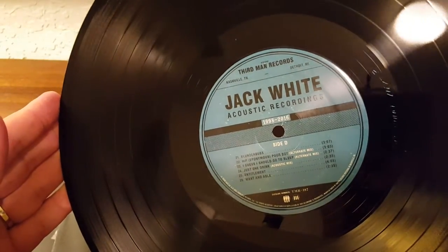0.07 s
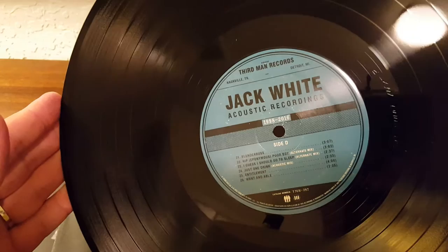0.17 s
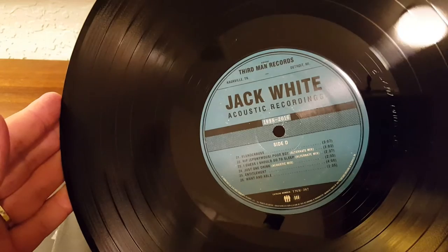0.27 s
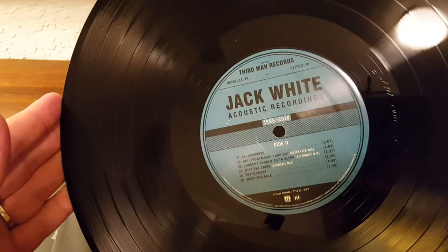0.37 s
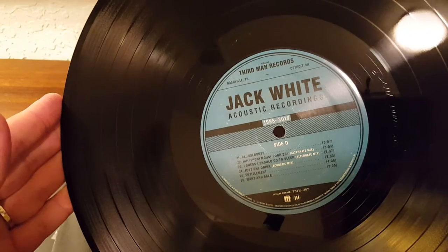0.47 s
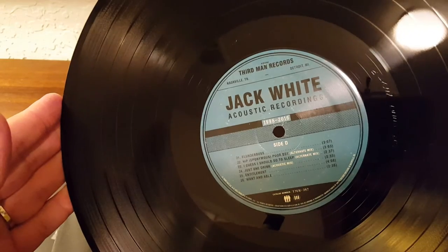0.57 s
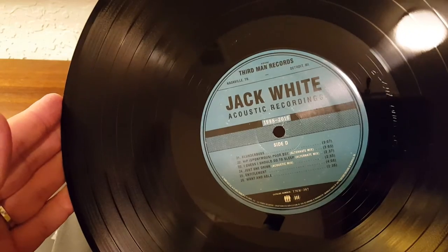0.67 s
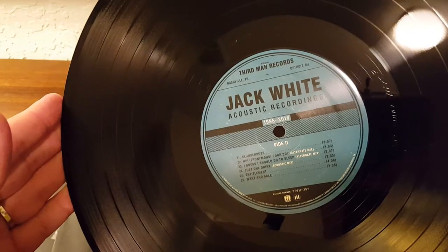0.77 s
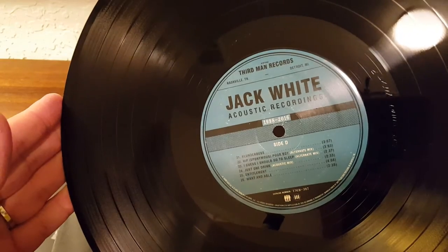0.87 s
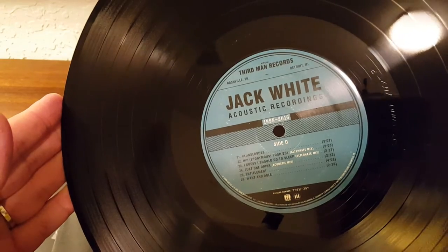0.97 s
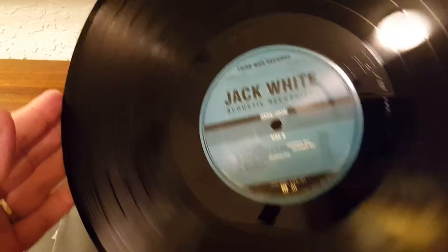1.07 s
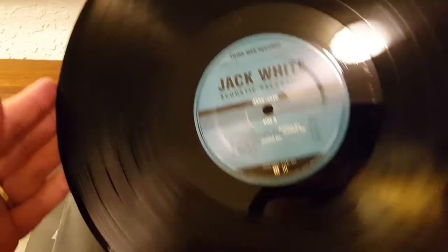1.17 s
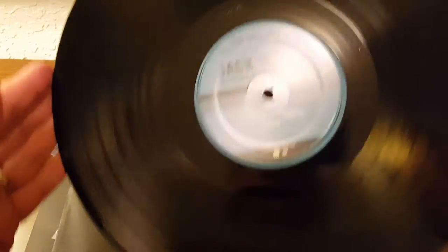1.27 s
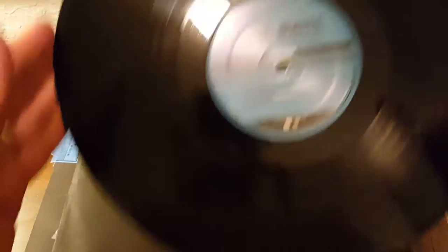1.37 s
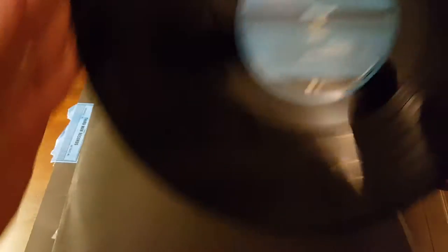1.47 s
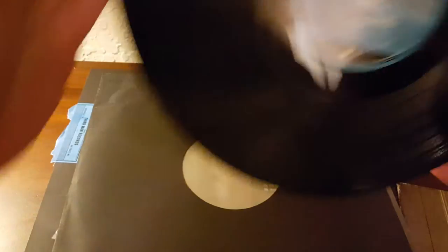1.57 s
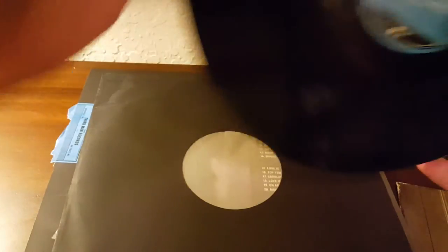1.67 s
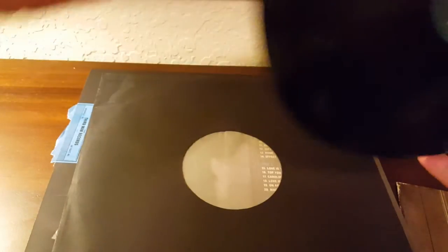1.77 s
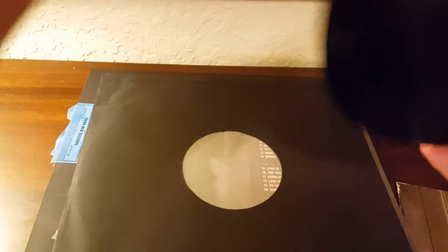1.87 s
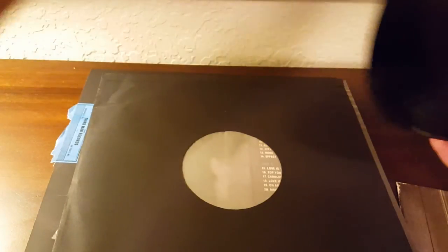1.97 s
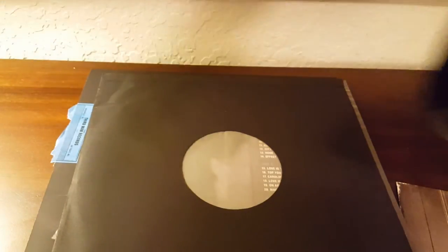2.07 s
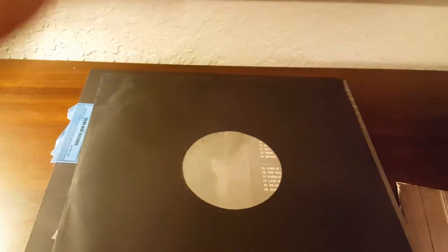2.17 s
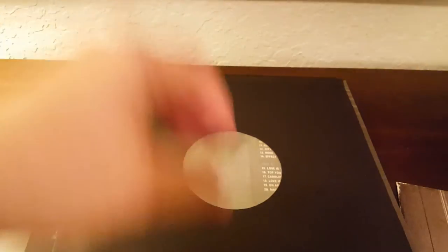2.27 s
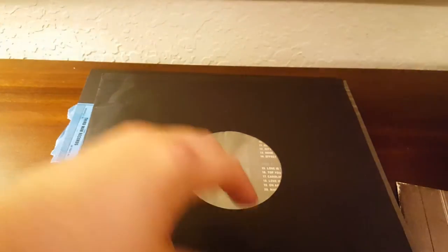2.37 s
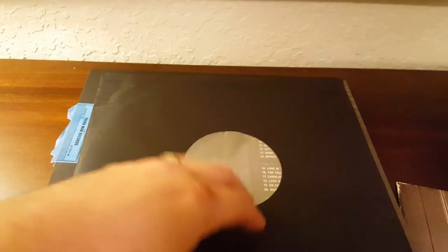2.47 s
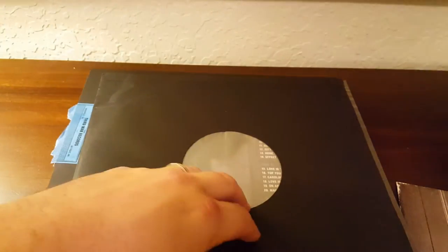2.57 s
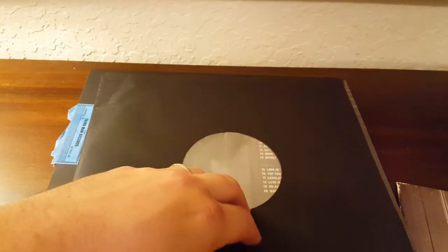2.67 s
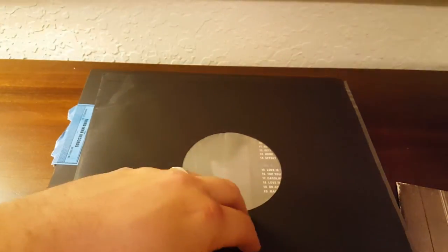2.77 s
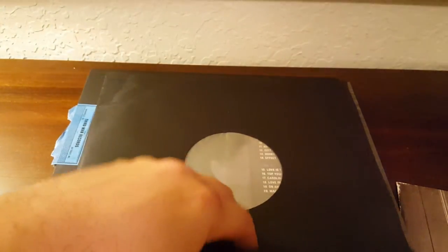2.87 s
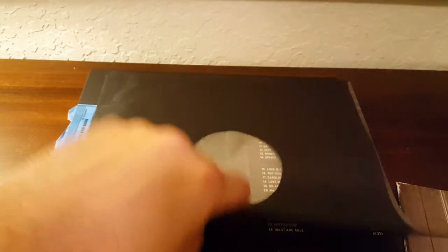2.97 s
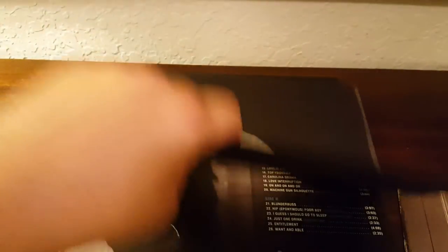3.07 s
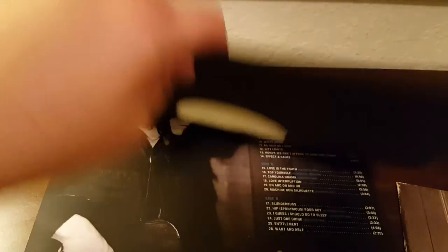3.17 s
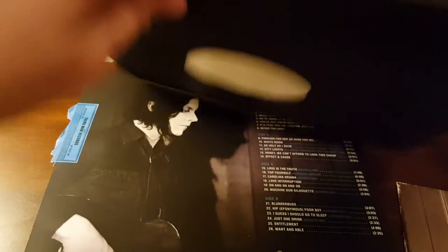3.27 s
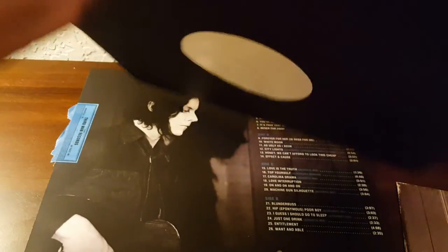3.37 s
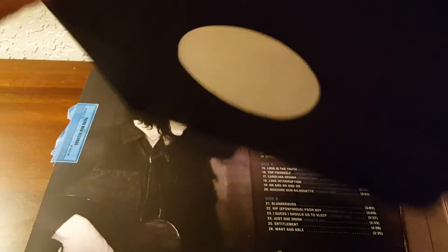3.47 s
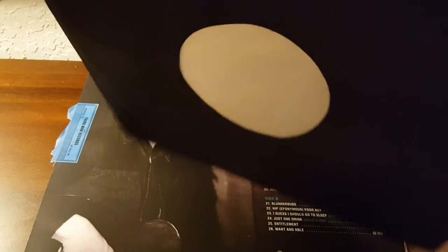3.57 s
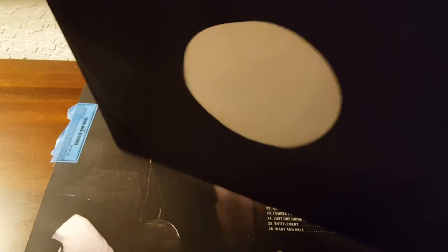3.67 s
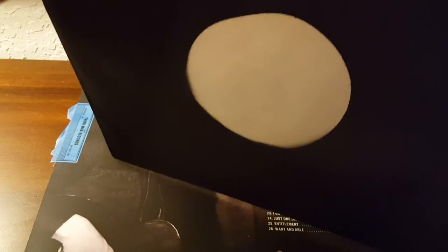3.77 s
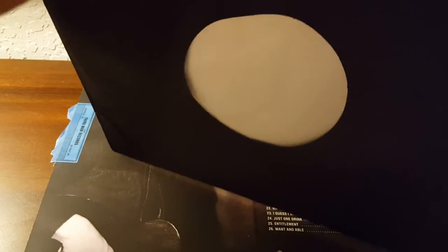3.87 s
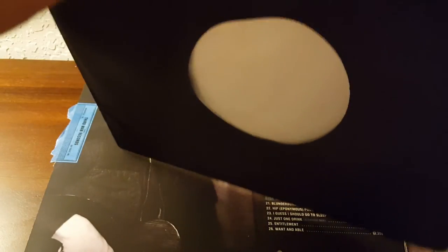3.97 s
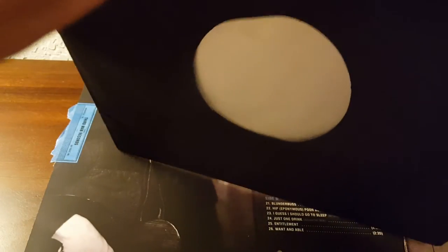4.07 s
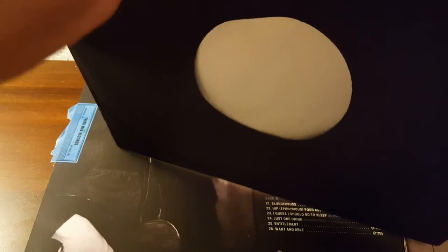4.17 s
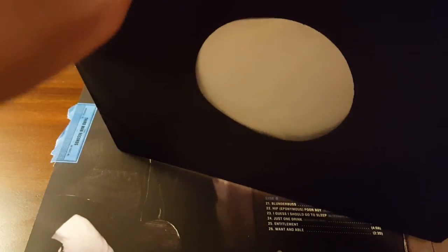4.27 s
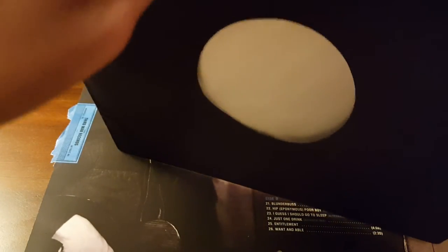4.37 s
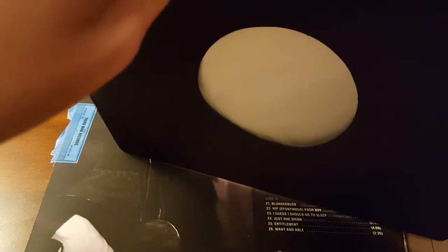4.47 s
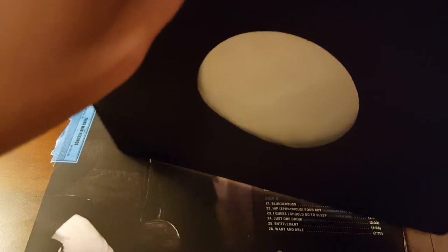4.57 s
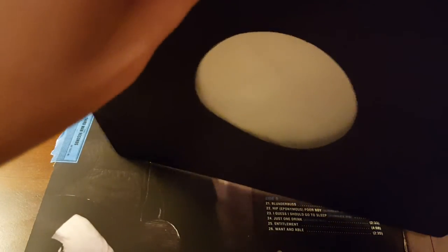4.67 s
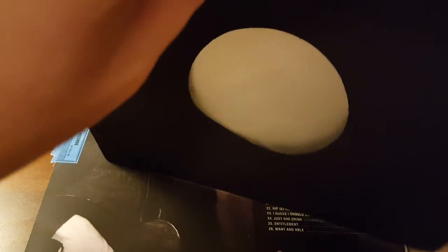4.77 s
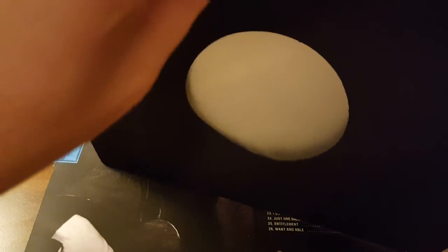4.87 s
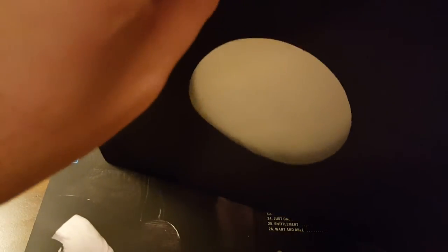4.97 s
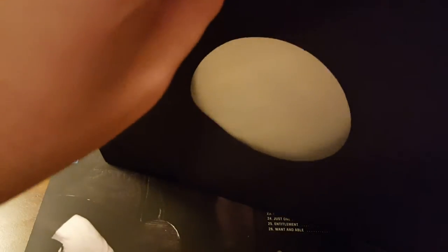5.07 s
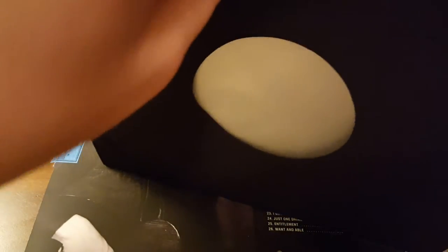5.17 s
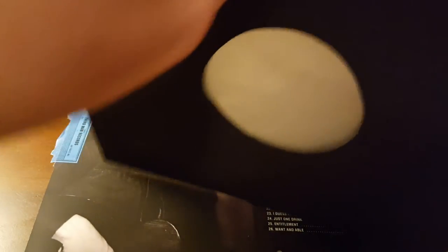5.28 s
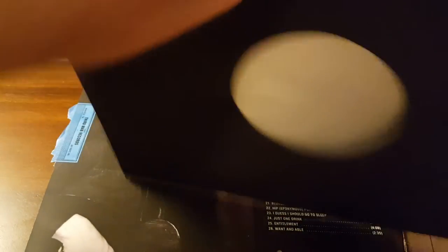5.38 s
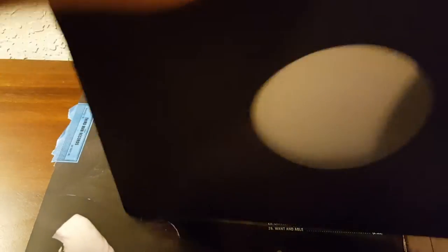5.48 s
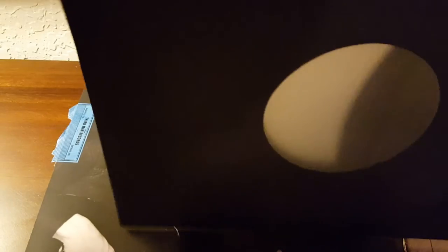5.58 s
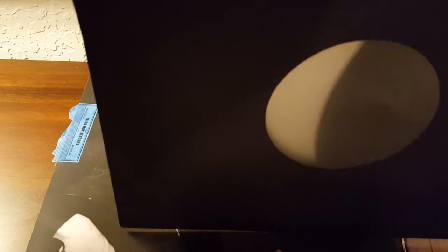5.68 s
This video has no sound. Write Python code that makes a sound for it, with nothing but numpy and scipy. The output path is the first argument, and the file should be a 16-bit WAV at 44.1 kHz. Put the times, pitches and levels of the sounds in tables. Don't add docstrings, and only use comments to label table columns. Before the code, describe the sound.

Close stereo recording in a small quiet room with faint hum and hiss. A held vinyl disc creaks under soft palm scuffs, then knocks dully on a wooden table. After a near-silent pause, a paper sleeve drags off a cardboard cover in dry scratchy bursts, then is worked open with sparse crackles, hollow pops and a loud final flurry.

```python
import sys
import numpy as np
from scipy import signal
from scipy.fft import rfft, irfft, next_fast_len
from scipy.io import wavfile
from scipy.ndimage import map_coordinates

SR = 44100
rng = np.random.default_rng(int(sys.argv[2]) if len(sys.argv) > 2 else 0)


def materialize(psi):
    bounded = np.clip(np.atleast_2d(psi).T, -1, 1)
    quanta = np.round(bounded * 32767).astype(np.int16)
    wavfile.write(sys.argv[1], SR, quanta)


def elevation(decibels):
    levels = np.asarray(decibels, float)
    return 10 ** (levels / 20)


N = 251811
T = np.arange(N) / SR

# (frequency [Hz], density [dB per Hz])
ROOM_TONE = [(20, -18), (60, -3), (100, 0), (160, -2), (250, -5), (500, -8), (800, -8), (1300, -12),
             (2000, -16), (3000, -20), (5000, -27), (8000, -45)]
# (frequency [Hz], correlation [1])
TONE_LIKENESS = [(60, 0.6), (240, 0.4), (950, 0.5), (3770, -0.7), (15000, -0.7)]
# (frequency [Hz], width [Hz], level [dB])
HUM_BAND = (119, 11, -74.5)
# (frequency [Hz], level [dB])
WHINE_TONE = (8624, -94)
# (frequency [Hz], density [dB per Hz])
MIC_HISS = [(2000, -8.5), (5000, -6), (10000, -9), (13000, -5.5), (15800, -4.5)]
ROOM_TONE_DB, MIC_HISS_DB = -69.5, -83.5

# (time [s], peak [dB], pitch [Hz])
DISC_CREAKS = [
    (1.283, -58.5, 295),
    (1.381, -55, 93),
    (1.487, -52.5, 210),
    (1.599, -54.5, 280),
    (1.779, -58.5, 653),
    (1.895, -46.5, 96),
    (1.919, -48.5, 93.2),
    (2.571, -46, 107),
    (2.708, -60.5, 197),
]
CREAK_T60, SING_T60, POP_T60, DRUM_T60 = 0.087, 0.02, 0.017, 0.044

# (start [s], length [s], rub level [dB], sag over the hold [dB], fizz over rub [dB])
HELD_DRAGS = [(1.497, 0.82, -74.5, 0, -7), (2.8596, 0.056, -55, -4, -2), (2.919, 0.078, -58.5, 4, 6.5),
              (2.991, 0.078, -52.5, -2, 0.5), (3.077, 0.048, -52, -0.5, -6), (3.13, 0.024, -45, 2.5, -3),
              (3.148, 0.079, -50, -3, 1), (3.229, 0.067, -48.5, 2.5, -4), (3.302, 0.043, -61.5, -3, -11),
              (3.416, 0.042, -62.5, 13, -4), (3.444, 0.13, -70.5, 3, -9), (3.7326, 0.038, -49.5, 0, -16),
              (3.859, 0.093, -54.5, 11.5, -10), (4.12, 0.052, -56.5, 10, -4), (4.38, 0.02, -55.5, 0, -3),
              (4.706, 0.03, -58, 8, 0.5), (5.06, 0.065, -56, -1, -8), (4.203, 0.049, -64, -1, -2),
              (4.247, 0.16, -67, -3.5, -15), (4.619, 0.093, -62, 2, -7.5), (4.771, 0.047, -52.5, 3, -18),
              (4.835, 0.039, -62, 1, -12), (4.904, 0.03, -48, -10.5, -22), (5.132, 0.017, -56.5, 1, -13),
              (5.28, .06, -60, -1, 7), (5.395, 0.038, -37.5, 20, -4.5), (5.424, 0.17, -47.5, 10.5, -1),
              (5.587, 0.22, -60.5, 5.5, 9.5)]
# (top [s], rub level [dB], rise [s], fall [s], fizz over rub [dB])
HAND_SWEEPS = [(1.35, -73, 0.021, 0.034, -1), (1.384, -71, 0.016, 0.097, -5.5),
               (1.7, -64, 0.031, 0.0067, -25), (2.106, -72, 0.024, 0.17, -4.5),
               (2.572, -60.5, 0.002, 0.022, -2.5), (2.662, -69.5, 0.0058, 0.014, 1.5),
               (2.722, -79.5, 0.02, 0.07, 11), (2.78, -67.5, 0.061, 0.23, -1.5),
               (3.39, -67, 0.043, 0.026, 4.5), (3.578, -62.5, 0.038, 0.014, -2.5),
               (4.182, -50.5, 0.02, 0.021, -13), (3.744, -43, 0.004, 0.016, -12),
               (4.035, -56, .06, 0.079, -11.5), (4.419, -46, 0.019, 0.037, -10),
               (4.569, -55, 0.016, 0.019, -13), (4.53, -59, 0.085, 0.039, -16),
               (4.745, -50.5, 0.04, 0.021, -21), (4.938, -37.5, 0.019, 0.019, -9),
               (5.0, -62, .04, 0.047, -9), (5.087, -51.5, 0.015, 0.02, -8),
               (5.185, -53, 0.037, 0.06, -13.5), (5.325, -57.5, 0.043, 0.03, 4.5),
               (5.362, -40.5, 0.019, 0.029, -10.5)]
GRIP_S, LET_GO_S = 0.001, 0.0086
FIZZ_LINGERS = 1.37
FIZZ_LAG_DB, FIZZ_LAG_S = 9, 0.011
# (time [s], flex over rub [dB])
SLACK = [(1.3, 3), (1.9, 0.5), (2.1, -3), (2.55, -14.5), (2.8, -6.5), (3.0, 0.5), (3.25, -5.5), (3.4, 3),
         (3.7, 1), (3.9, 1), (4.15, 1), (4.4, 0), (4.6, 1), (4.8, 7), (4.95, -2.5), (5.2, -5.5),
         (5.36, 8.5), (5.5, 6.5)]
STIFFEN, FIRM_DB = 0.33, -54.5
# (time [s], frequency [Hz])
SHEET_RING = [(1.3, 1580), (2.65, 1560), (2.9, 3180), (2.98, 2240), (3.1, 2460), (3.2, 2960), (3.29, 2500),
              (3.7, 1670), (3.76, 1470), (3.88, 2130), (4.35, 1640), (4.57, 2000), (4.88, 1570),
              (4.97, 2500), (5.1, 2130), (5.18, 1610), (5.31, 2430), (5.37, 1610), (5.6, 1920)]
# (time [s], frequency [Hz])
EDGE_RING = [(2.5, 5840), (2.55, 4600), (2.7, 5600), (2.73, 4500), (3.06, 5400), (3.18, 4120), (3.4, 5660),
             (3.5, 4620), (3.58, 6400), (3.75, 4730), (5.24, 4190), (5.41, 4550), (5.46, 6850), (5.7, 6690)]
# (frequency [Hz], density [dB per Hz])
RUB_SPECTRUM = [(290, -64), (500, -10.5), (669, -5.5), (1090, -6), (1260, -4.5), (2000, -8.5), (2100, -6),
                (3170, -10), (3430, -10), (3680, -12), (5500, -18), (7150, -27.5), (12100, -120)]
FIZZ_SPECTRUM = [(2060, -14), (3500, -3.5), (5160, -5.5), (6650, -2.5), (11500, -5), (12800, -6.5),
                 (15200, -7), (16000, -41.5)]
FLEX_SPECTRUM = [(18, -53), (30, 5.5), (85, -4.5), (274, -1.5), (341, -9), (468, -2.5), (560, -13.5),
                 (678, -5), (800, -10.5), (1040, -12), (1760, -120)]
# (frequency [Hz], width [Hz], level [dB])
AIR_POCKET = [(720, 56, -1), (1533, 88, 1), (2500, 260, -6)]
POCKET_OPENS_S, POCKET_DB = 3.6, -4.5

# (time [s], peak [dB], pitch [Hz])
PATCH_SINGS = [(1.378, -54.5, 800), (1.693, -53, 1560), (2.556, -56, 915), (2.569, -53, 1630),
               (2.57, -59, 4230), (2.581, -53, 1610), (2.737, -62, 4020), (2.752, -59, 3800),
               (3.021, -48, 2350), (4.835, -48, 3300), (4.89, -44, 640), (4.9, -42, 704),
               (3.146, -38, 2250), (3.186, -36, 3580), (3.202, -38, 2800), (3.741, -36.5, 1430),
               (3.752, -38, 1305), (3.762, -49, 1240), (4.172, -47, 1530), (4.175, -46.5, 3150),
               (4.18, -38, 1555), (4.186, -38, 1640), (4.39, -42, 1470), (4.417, -37, 780),
               (4.419, -35, 2620), (4.437, -33.5, 1590), (4.449, -45, 1660), (4.563, -38, 2270),
               (4.567, -50, 736), (4.718, -50, 4500), (4.928, -32.5, 3380), (4.947, -35.5, 3540),
               (5.072, -50, 685), (5.085, -50, 2100), (5.166, -57, 1310), (5.185, -49, 1550),
               (5.284, -50, 3820), (5.312, -40.5, 3780), (5.332, -35, 3420), (5.7, -44.5, 1420)]
# (time [s], level [dB])
PALM_PRESSURE = [
    (1.484, -90),
    (1.49, -64),
    (1.7, -65.5),
    (1.74, -71),
    (1.83, -65),
    (1.96, -64),
    (2.02, -78),
    (2.09, -66),
    (2.14, -60),
]
# (frequency [Hz], density [dB per Hz])
PALM_SPECTRUM = [(90, -26.5), (160, -4.5), (280, 0), (450, -5), (700, -28.5), (1200, -38.5)]

# (time [s], peak [dB], centre [Hz])
CREASE_SNAPS = [(1.6946, -43, 840), (2.57, -45.5, 1610), (2.7833, -38.5, 990), (2.8603, -38, 2150),
                (2.9916, -38, 2000), (3.1273, -29.5, 1200), (3.175, -23.5, 3980), (3.227, -38, 4500),
                (3.4515, -38.5, 900), (3.7345, -41, 895), (3.868, -48, 1790), (4.387, -33, 1000),
                (4.4065, -29.5, 5600), (4.414, -29.5, 2970), (4.6667, -36.5, 2350), (4.905, -41, 1420),
                (4.9346, -35, 1260), (4.9448, -19, 4170), (5.06, -51.5, 1500), (5.362, -18.5, 1500),
                (5.409, -26, 2610), (5.457, -23, 1700), (5.501, -35, 1800)]
# (time [s], peak [dB], centre [Hz])
EDGE_FLICKS = [(2.5422, -52, 1050), (2.5965, -52, 6000), (2.659, -55, 991), (2.7112, -62, 977),
               (3.5037, -53, 1510), (3.8145, -46.5, 3500), (4.1042, -40, 1510), (4.1185, -43, 2200),
               (4.138, -56, 3000), (4.79, -48, 3400), (5.3928, -28, 2000), (4.642, -43.5, 4200),
               (4.773, -42, 1020), (4.3277, -49.5, 1130), (4.364, -40.5, 6300), (4.4804, -42.5, 4200),
               (4.836, -39, 3280), (5.5663, -30, 3420)]
SNAP_TICK_DB, FLICK_TICK_DB = -32, -5.5

# (time [s], level [dB])
TABLE_KNOCKS = [
    (2.1448, -22.5),
    (2.1489, -13),
    (2.165, -29),
]
# (frequency [Hz], level [dB], t60 [s])
TABLE_MODES = [(95.8, -12.5, 0.31), (158.4, -9.5, 0.18), (217.6, -11.5, 0.18), (260, -6, 0.11),
               (292, -9, 0.15), (437, -1, 0.085), (457, -11, 0.24), (510, -17.5, 0.18), (540, 8, 0.034),
               (546, -6.5, 0.13), (606, -12, 0.22), (768, -11.5, 0.13), (940, -22, 0.12), (1154, -24, 0.1)]
# (frequency [Hz], density [dB per Hz])
SHIVER_SPECTRUM = [(530, -37), (900, -8.5), (1120, -4.5), (1410, -23), (1610, -17), (2480, -23),
                   (2970, -25), (7000, -47), (9100, -79), (15400, -120)]

# (time [s], peak [dB], pitch [Hz])
SHEET_POPS = [(2.862, -41.5, 620), (3.331, -47.5, 327), (3.417, -45.5, 269), (3.449, -47, 199),
              (3.734, -45, 506), (2.873, -49, 710), (3.226, -43.5, 326), (3.317, -53, 403),
              (4.127, -44.5, 356), (4.136, -47, 199), (4.02, -49, 295), (4.038, -57, 344),
              (5.157, -49, 244), (5.364, -26, 248), (5.532, -37, 260), (4.069, -39.5, 213),
              (4.385, -38, 158), (4.529, -42, 297), (4.688, -40.5, 197), (4.795, -32, 240),
              (4.806, -42, 300), (4.82, -43, 340), (5.12, -50, 520), (5.31, -54, 544), (5.334, -38.5, 540),
              (5.344, -38, 506), (4.912, -32, 720), (5.353, -26, 258), (5.361, -26, 265),
              (5.392, -21.5, 222), (5.407, -31.5, 179), (5.398, -29, 500), (5.435, -39, 497),
              (5.429, -51, 280), (5.469, -33, 91.5), (5.529, -28.5, 238), (5.579, -32, 150),
              (5.638, -51, 152)]
# (time [s], peak [dB], pitch [Hz])
COVER_DRUMS = [
    (2.912, -47.5, 538),
    (2.992, -41.5, 497),
    (3.033, -43, 550),
    (3.061, -38, 530),
    (3.1, -42, 536),
    (3.127, -38.5, 572),
    (3.155, -38.5, 502),
    (3.177, -45, 504),
    (3.225, -47, 512),
]
# (time [s], frequency [Hz], level [dB])
FINGER_SQUEAK = [
    (5.275, 1657, -75),
    (5.29, 1895, -51),
    (5.305, 2260, -38),
    (5.32, 2720, -47),
    (5.335, 3370, -49),
    (5.345, 3730, -67),
]

# (time [s], left lag [samples], left over right [dB])
SOURCE_PLACE = [(1, -6, -0.5), (2.3, -3.5, -2), (3, 1, -0.5), (3.9, 7.5, -1), (4.3, 11, -2), (5.7, 9, -3.5)]
# (frequency [Hz], t60 [s])
ROOM_T60 = [(150, 0.39), (1000, 0.27), (5000, 0.22), (14000, 0.061)]


def unit(x):
    return x / np.sqrt(np.mean(x ** 2) + 1e-20)


def along(points, hz):
    f, v = np.transpose(points)
    return np.interp(np.log(hz + 1), np.log(f + 1), v)


def curves(rows):
    s, *columns = np.transpose(rows)
    return [np.interp(T, np.maximum.accumulate(s), column) for column in columns]


def wobble(rate):
    knots = rng.standard_normal(int(N * rate / SR) + 4)
    return np.interp(T * rate, np.arange(len(knots)), knots)


def filtered(x, response):
    m = next_fast_len(N + 8192)
    return irfft(rfft(x, m) * response(np.fft.rfftfreq(m, 1 / SR)), m)[..., :N]


def coloured(x, spectrum):
    return unit(filtered(x, lambda hz: elevation(along(spectrum, hz))))


def add(x, s, piece):
    x[round(s * SR):][:len(piece)] += piece[:N - round(s * SR)]


def damped_rings(rows, t60, overtone):
    x, t = np.zeros(N), np.arange(SR // 5) / SR
    shape = elevation(-60 * t / t60) * (1 - np.exp(-t / 0.0038))
    for s, db, hz in rows:
        ring = np.sin(2 * np.pi * hz * t) + overtone * np.sin(2 * np.pi * 2.3 * hz * t)
        add(x, s, elevation(db - 4.0) * ring * shape / shape.max())
    return x


def fibres(spread_db, clump_db, own, crackle_db, ring_hz=None, ring_db=0):
    shared, left, right = rng.standard_normal((3, N))
    size = elevation(spread_db * rng.standard_normal(N) + clump_db * (wobble(40) + wobble(160)))
    stiff = rng.random(N) < 150 / SR
    crackle = elevation(crackle_db + 3.7 * rng.standard_normal(N)) * stiff
    slips = size * (shared + own * np.array([left, right])) + crackle
    if ring_hz is None:
        return slips
    hz, t, z = signal.stft(slips, SR, nperseg=256)
    centre = np.interp(t, T, ring_hz)
    detuning = np.log(hz[:, None] / centre + 1e-3)
    ring = elevation(ring_db / (1 + (detuning / 0.22) ** 2))
    return signal.istft(z * ring, SR, nperseg=256)[1][:, :N]


def air():
    def mid_and_side(hz):
        angle = np.arccos(np.clip(along(TONE_LIKENESS, hz), 0, 1)) / 2
        return elevation(along(ROOM_TONE, hz)) * [hz ** 0, np.tan(angle)]

    mid, side = filtered(rng.standard_normal((2, N)), mid_and_side)
    tone = elevation(ROOM_TONE_DB) * np.array([mid + side, mid - side]) / np.std(mid)
    hiss = elevation(MIC_HISS_DB + 7.5) * coloured(rng.standard_normal((2, N)), MIC_HISS)
    hum_hz, hum_width, hum_db = HUM_BAND
    hum = unit(filtered(rng.standard_normal(N), lambda hz: 1 / (1 + ((hz - hum_hz) / hum_width) ** 2)))
    whine_hz, whine_db = WHINE_TONE
    whine = elevation(whine_db + 5.0 + 0.8 * wobble(4.5)) * np.sin(2 * np.pi * whine_hz * T)
    return tone + hiss + elevation(hum_db) * hum + whine


def creaks():
    return damped_rings(DISC_CREAKS, CREAK_T60, 0.16)


def strokes():
    rows = [(s, GRIP_S, hold, LET_GO_S, db, sag, fizz) for s, hold, db, sag, fizz in HELD_DRAGS]
    rows += [(s, rise, 1e-3, fall, db, 0, fizz) for s, db, rise, fall, fizz in HAND_SWEEPS]
    rub_power, fizz_power = np.full((2, N), 1e-14)
    for s, rise, hold, fall, db, sag, fizz in rows:
        at = slice(round((s - 0.5) * SR), round((s + hold + 0.5) * SR))
        u = T[at] - s
        held = db - sag * np.clip(u / hold, 0, 1) - 10 * np.maximum(-u, 0) / abs(rise)
        release = 10 * np.maximum(u - hold, 0) / abs(fall)
        lag = FIZZ_LAG_DB * (rise == GRIP_S) * np.exp(-np.abs(u) / FIZZ_LAG_S)
        rub_power[at] += elevation(2 * (held - release))
        fizz_power[at] += elevation(2 * (held + fizz - lag - release / FIZZ_LINGERS))
    return 10 * np.log10(rub_power), 10 * np.log10(fizz_power)


def pocket_response(hz):
    return sum(elevation(db) * 1j * hz * width / (centre ** 2 - hz ** 2 + 1j * hz * width)
               for centre, width, db in AIR_POCKET)


def rubbing():
    rub_db, fizz_db = strokes()
    (slack_db,), (sheet_hz,), (edge_hz,) = curves(SLACK), curves(SHEET_RING), curves(EDGE_RING)
    flex_db = rub_db + slack_db - STIFFEN * (np.maximum(rub_db, -75) - FIRM_DB)
    sheet_slips = fibres(3.8, 1.86, 2.2, 22.3, np.maximum(sheet_hz, 500), ring_db=5.0)
    edge_slips = fibres(5.0, 1.66, 9.9, 22, edge_hz, ring_db=4)
    rub = elevation(rub_db + 1.5) * coloured(sheet_slips, RUB_SPECTRUM)
    fizz = elevation(fizz_db + 1.53) * coloured(edge_slips, FIZZ_SPECTRUM)
    flex = elevation(flex_db - 2.5) * coloured(fibres(3.85, 2.75, 0.19, 16.2), FLEX_SPECTRUM)
    hollow = unit(filtered(fibres(1.9, 2.5, 0.99, 24), pocket_response))
    pocket = (T > POCKET_OPENS_S) * elevation(rub_db + POCKET_DB) * hollow
    return rub + fizz + flex + pocket


def sings():
    return damped_rings(PATCH_SINGS, SING_T60, 0)


def palm():
    db, = curves(PALM_PRESSURE)
    on = (T > PALM_PRESSURE[0][0]) & (T < PALM_PRESSURE[-1][0])
    return on * elevation(db) * coloured(fibres(3.6, 3.0, 0.2, 9.3), PALM_SPECTRUM)


def snaps():
    x, t = np.zeros((2, N)), np.arange(1024) / SR
    rows = [(*r, SNAP_TICK_DB) for r in CREASE_SNAPS] + [(*r, FLICK_TICK_DB) for r in EDGE_FLICKS]
    noise = rng.standard_normal((len(rows), 3, 2, 1024))
    noise = 0.95 * noise[:, :1] + noise[:, 1:]
    noise[..., 6] += 3.5 * np.sign(noise[..., 6])
    start = 1 - np.exp(-t / 0.00012)
    crack_shape, tick_shape = start * elevation(-60 * t / 0.014), start * elevation(-60 * t / 0.0074)
    tick_band = signal.butter(2, [2200, 14000], "bandpass", fs=SR)
    for (s, db, hz, tick_db), both in zip(rows, noise):
        crack_band = signal.butter(2, [hz * 0.65, hz * 1.5], "bandpass", fs=SR)
        crack = signal.lfilter(*crack_band, both[:, 0] * crack_shape)
        tick = signal.lfilter(*tick_band, both[:, 1] * tick_shape)
        crack *= elevation(db - 4.0) / np.abs(crack).max()
        tick *= elevation(db + tick_db + 7.0) / np.abs(tick).max()
        add(x.T, s, (crack + tick).T)
    return x


def knock():
    x, t = np.zeros(N), np.arange(SR // 2) / SR
    ring = sum(elevation(db - 60 * t / t60) * np.sin(2 * np.pi * hz * t) for hz, db, t60 in TABLE_MODES)
    for s, db in TABLE_KNOCKS:
        add(x, s, elevation(db - 6.0) * ring * (1 - np.exp(-t / 0.0018)))
    x = signal.lfilter(*signal.butter(2, 115, "highpass", fs=SR), x)
    shiver = coloured(rng.standard_normal(N), SHIVER_SPECTRUM)[:len(t)]
    shape = elevation(-42 - 60 * t / 0.25) * (1 - np.exp(-t / 0.0045))
    add(x, TABLE_KNOCKS[1][0], shape * shiver)
    return x


def pops():
    return damped_rings(SHEET_POPS, POP_T60, 0.17)


def drums():
    return damped_rings(COVER_DRUMS, DRUM_T60, 0.15)


def squeak():
    hz, db = curves(FINGER_SQUEAK)
    on = (T > FINGER_SQUEAK[0][0]) & (T < FINGER_SQUEAK[-1][0])
    phase = 2 * np.pi * np.cumsum(hz * (1 + 0.033 * wobble(400))) / SR
    return on * elevation(db + 3.0 + 3 * wobble(170)) * np.sin(phase)


def ports(pair):
    lag, balance_db = curves(SOURCE_PLACE)
    heard = []
    for side, x in zip((1, -1), pair):
        delayed = map_coordinates(x, [np.arange(N) - side * lag / 2])
        heard.append(elevation(side * balance_db / 2) * delayed)
    return np.array(heard)


def room(x):
    hz, t, z = signal.stft(rng.standard_normal((2, SR // 2)), SR, nperseg=256)
    share = 1 / (1 + (hz[:, None] / 900) ** 2)
    z[1] = share * z[0] + np.sqrt(1 - share ** 2) * z[1]
    decay = elevation(-60 * t / along(ROOM_T60, hz)[:, None])
    tail = signal.istft(z * decay, SR, nperseg=256)[1]
    late = np.pad(x, (120, 0))[None]
    return signal.fftconvolve(late, tail / np.linalg.norm(tail[0]), axes=1)[:, :N]


def scene():
    quiet = air()
    rub, table = rubbing(), knock()
    cracks = creaks() + sings() + snaps() + pops() + drums() + squeak()
    far = room(elevation(-13.0) * (rub[0] + cracks[0]) + elevation(-14.0) * table)
    near = ports(rub + cracks + table + palm())
    return filtered(near + far, lambda hz: 1 / (1 + (61 / (hz + 1)) ** 4)) + quiet


def low_pass(x):
    return signal.sosfilt(signal.butter(12, 16500, fs=SR, output="sos"), x)


def record(dry):
    mix = filtered(dry, lambda hz: hz < 15900) - 0.0005
    return low_pass(mix)


dry = scene()
out = record(dry)
materialize(out)
```